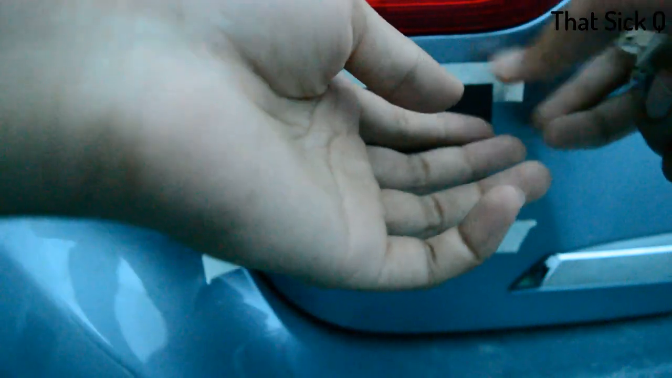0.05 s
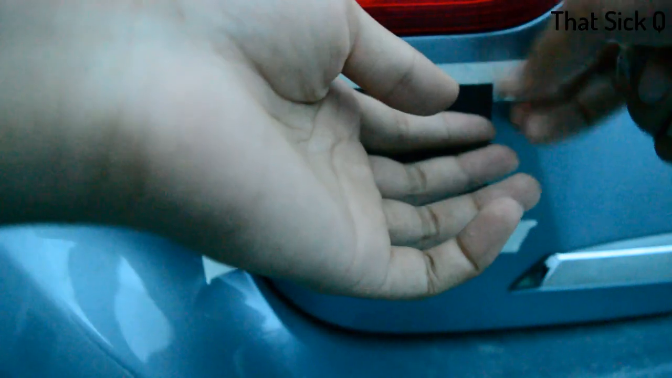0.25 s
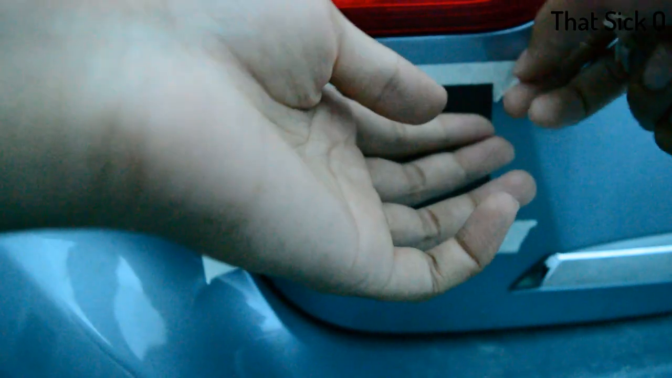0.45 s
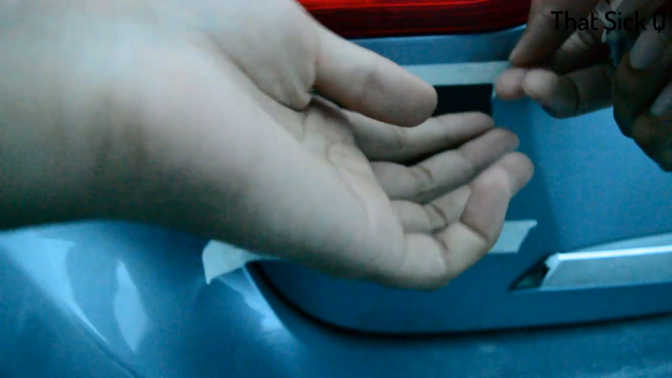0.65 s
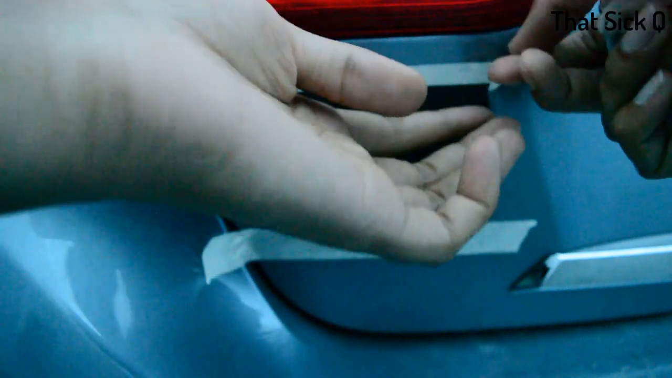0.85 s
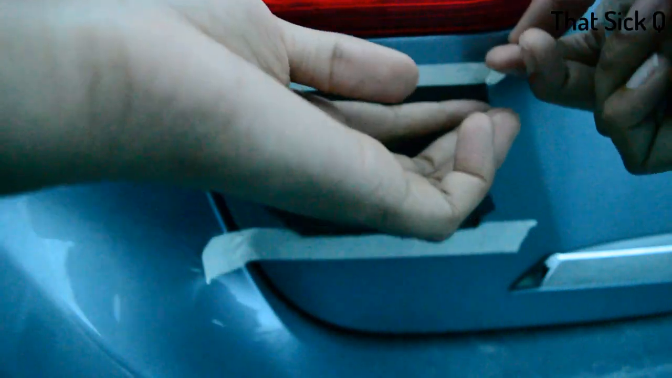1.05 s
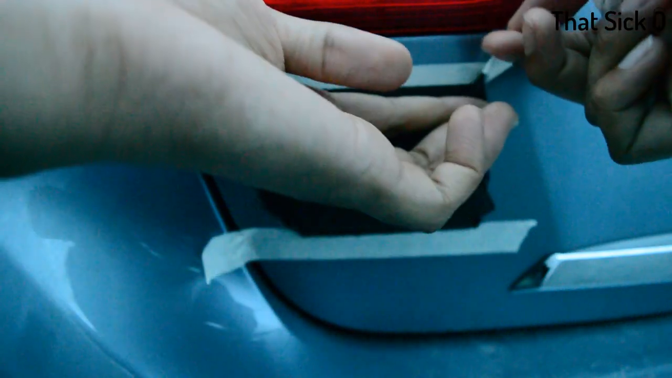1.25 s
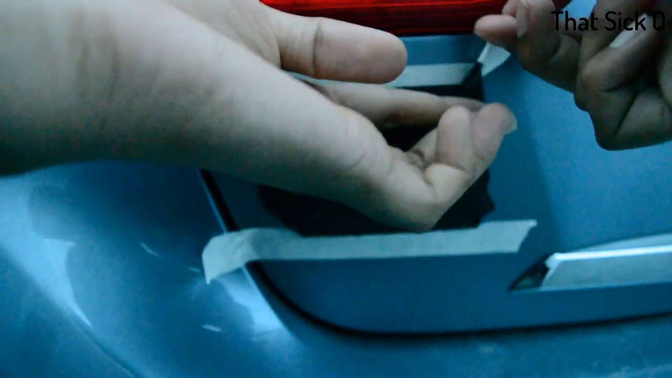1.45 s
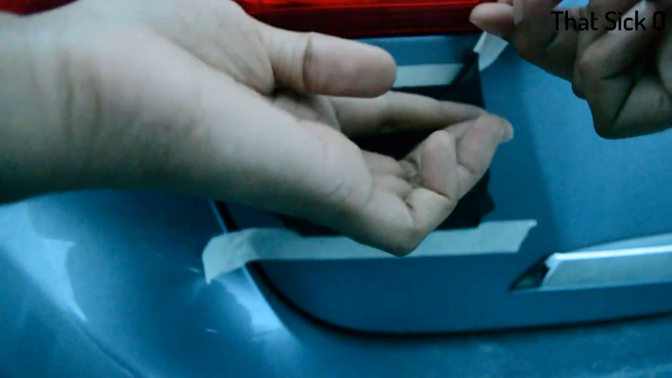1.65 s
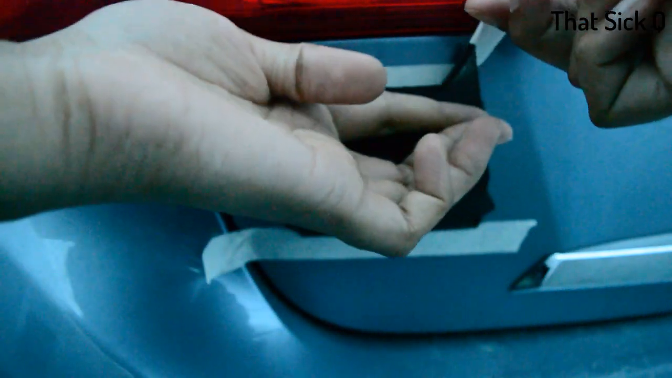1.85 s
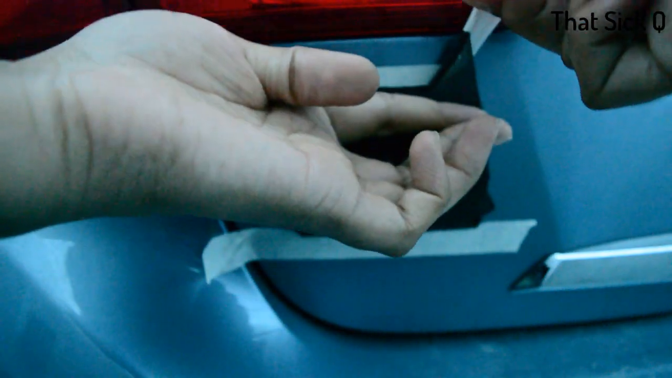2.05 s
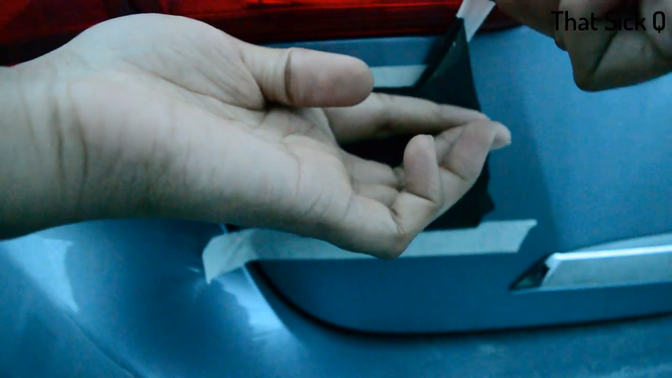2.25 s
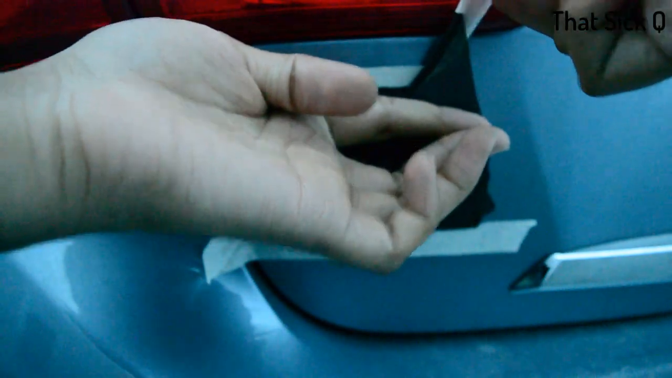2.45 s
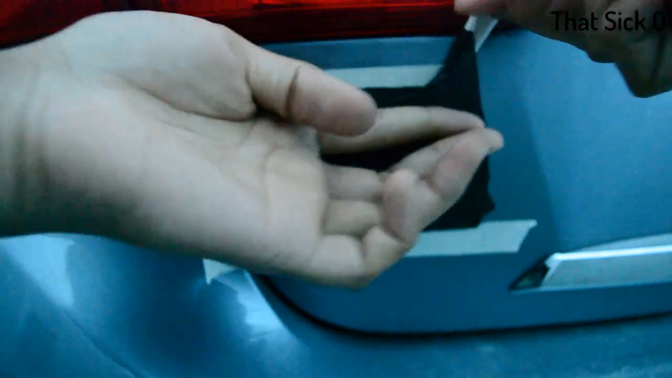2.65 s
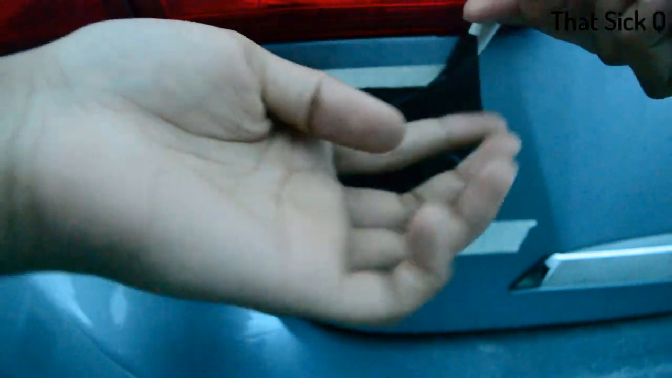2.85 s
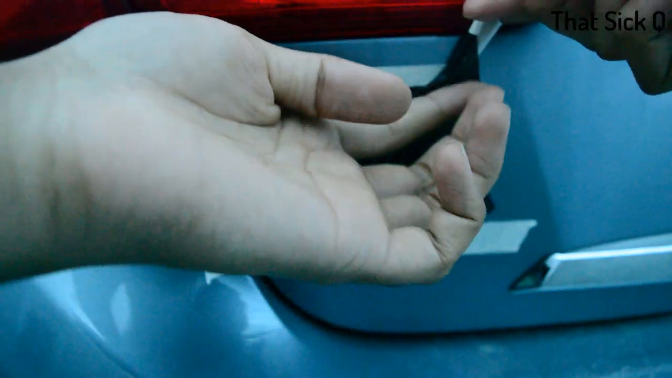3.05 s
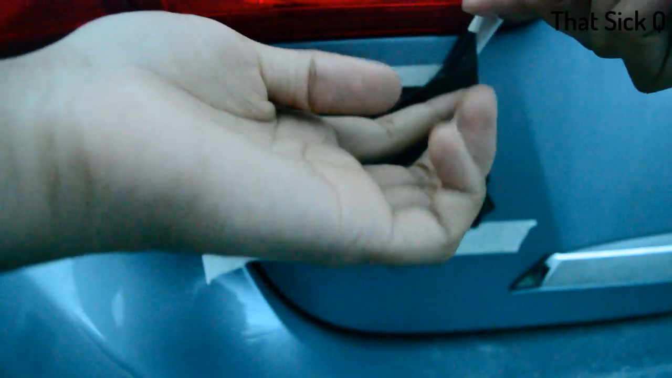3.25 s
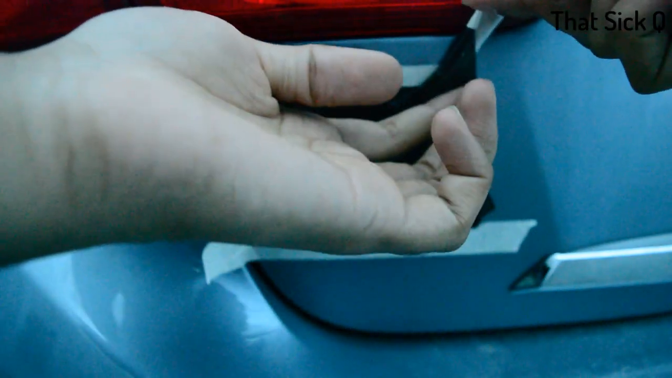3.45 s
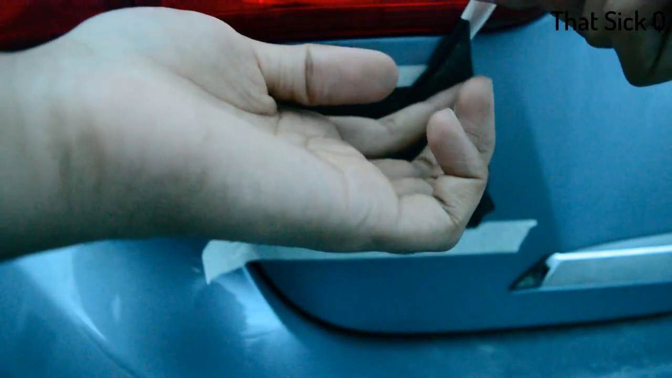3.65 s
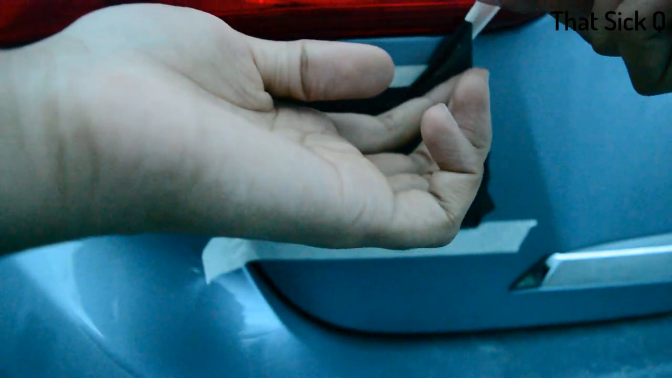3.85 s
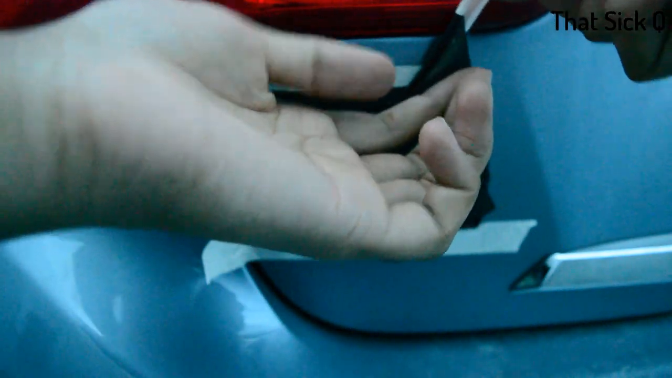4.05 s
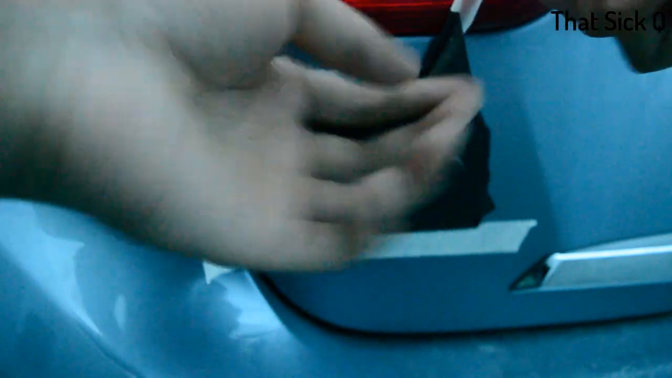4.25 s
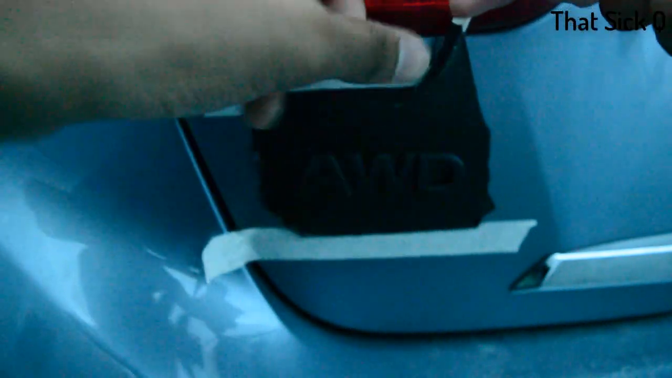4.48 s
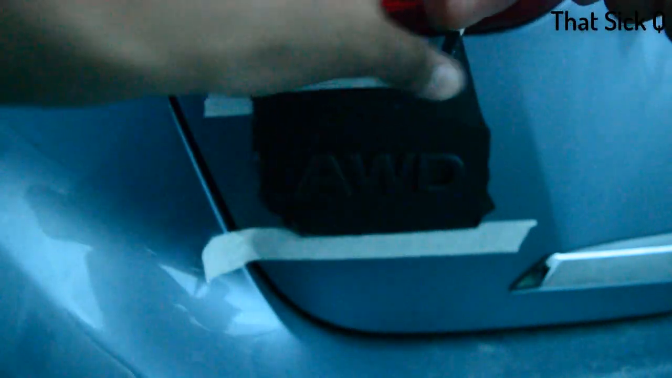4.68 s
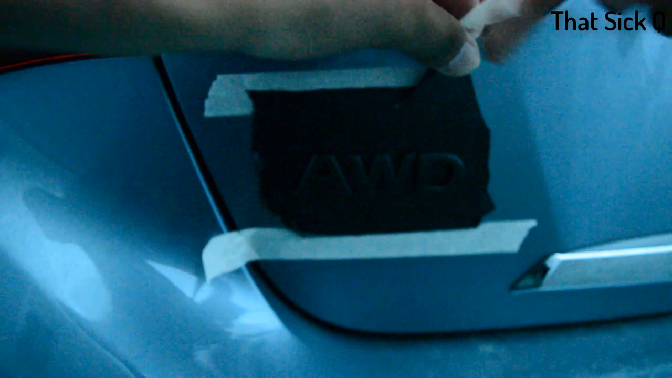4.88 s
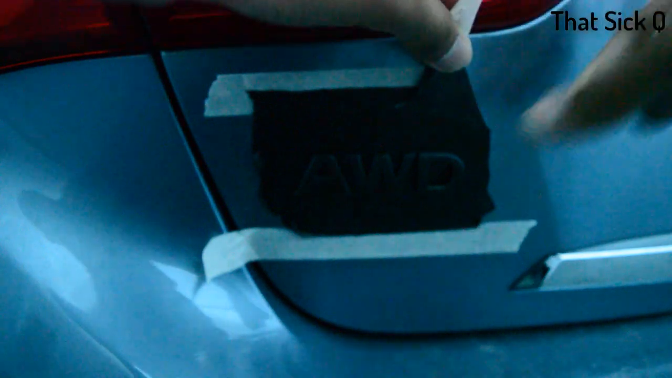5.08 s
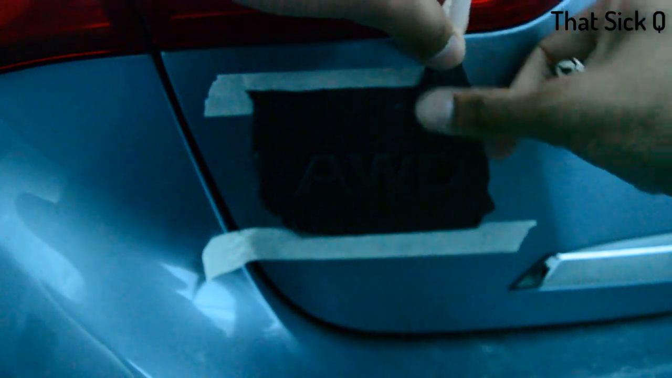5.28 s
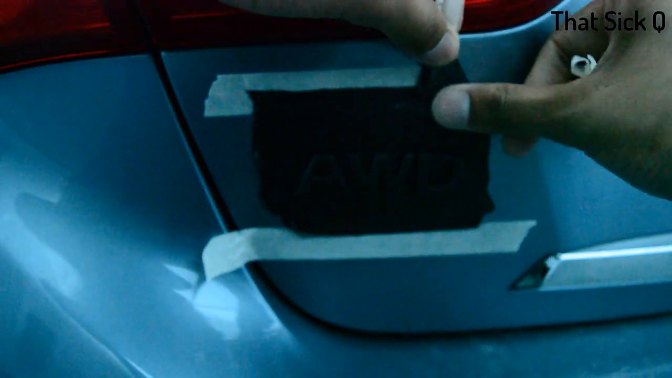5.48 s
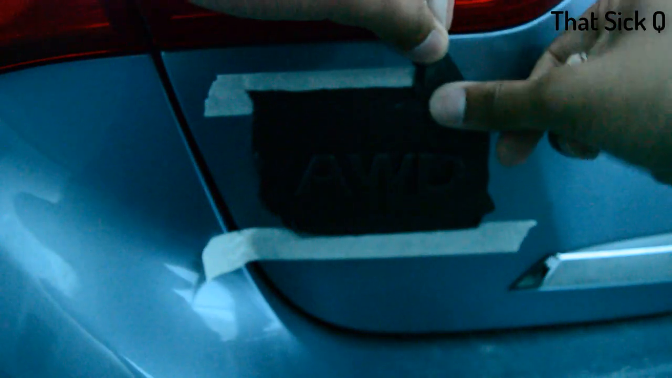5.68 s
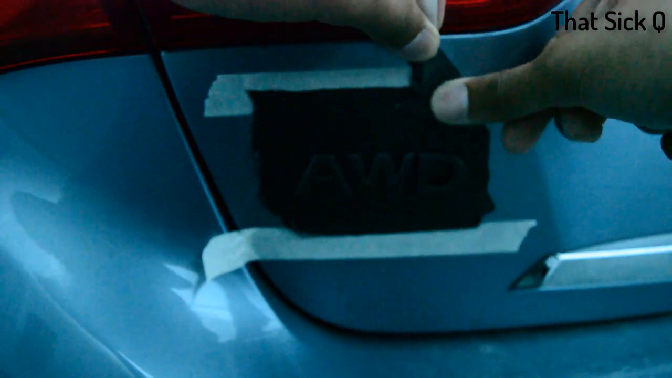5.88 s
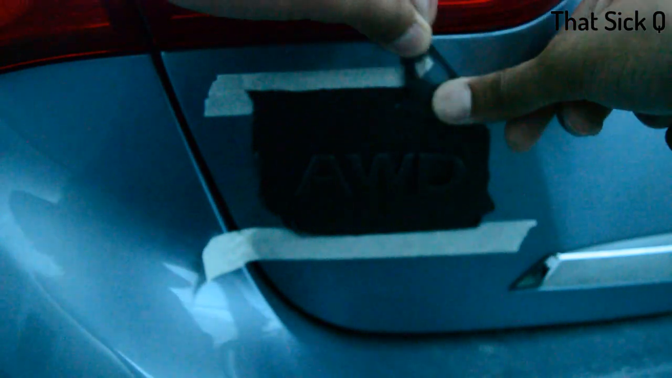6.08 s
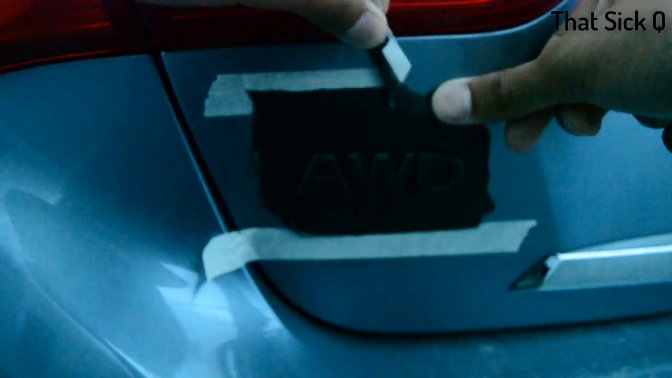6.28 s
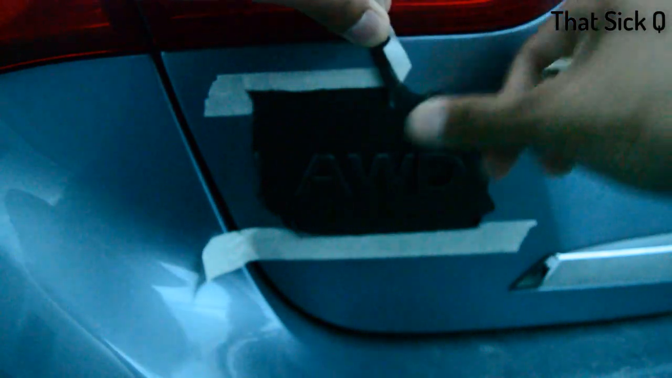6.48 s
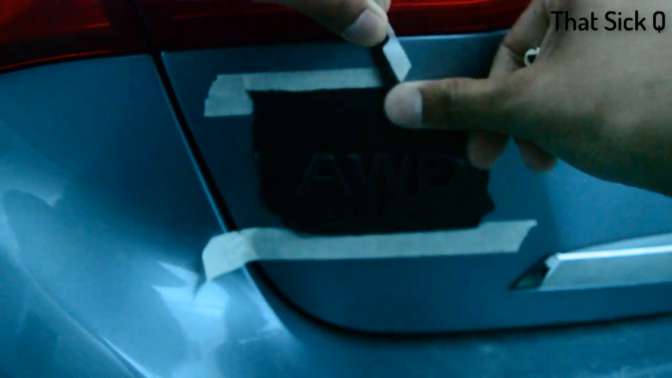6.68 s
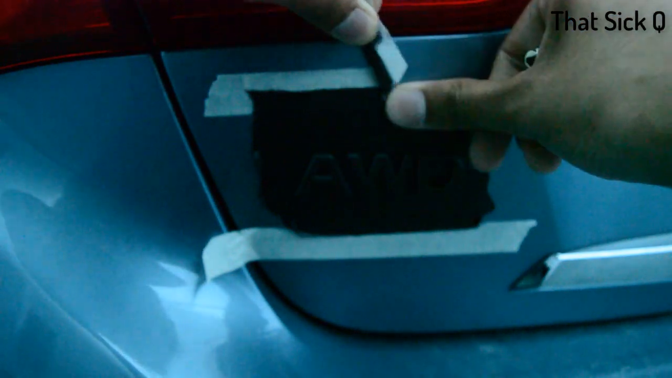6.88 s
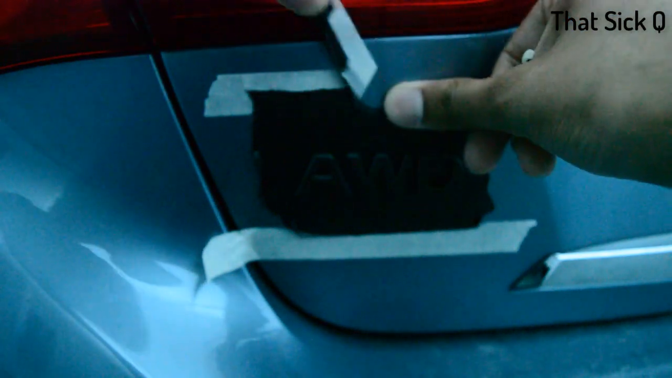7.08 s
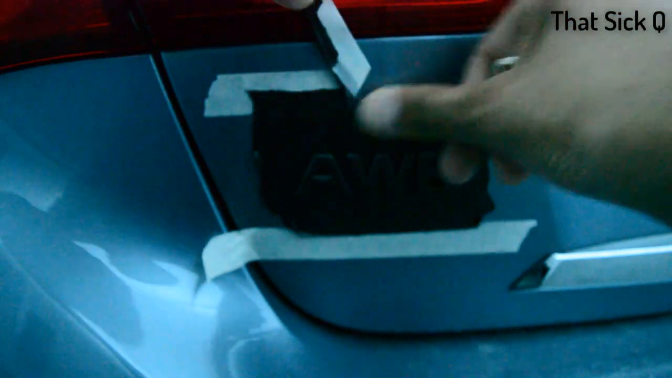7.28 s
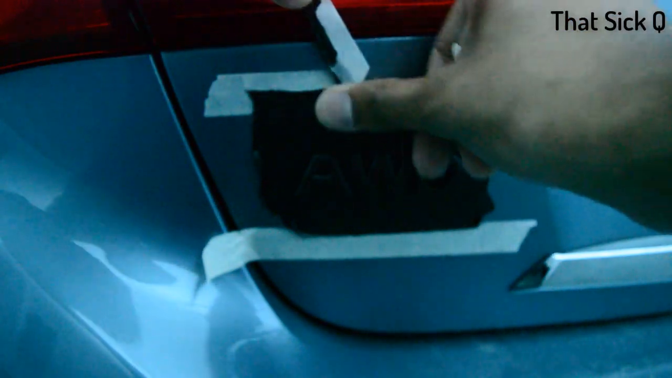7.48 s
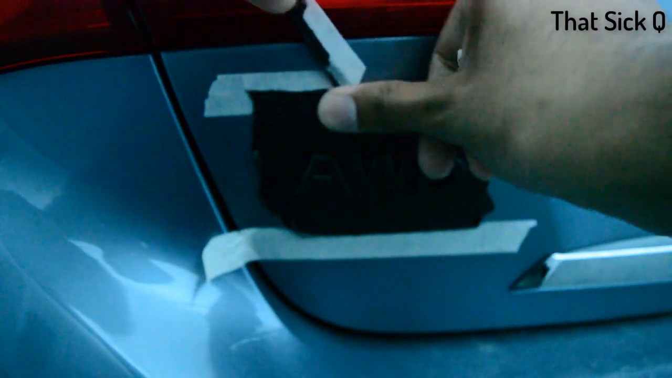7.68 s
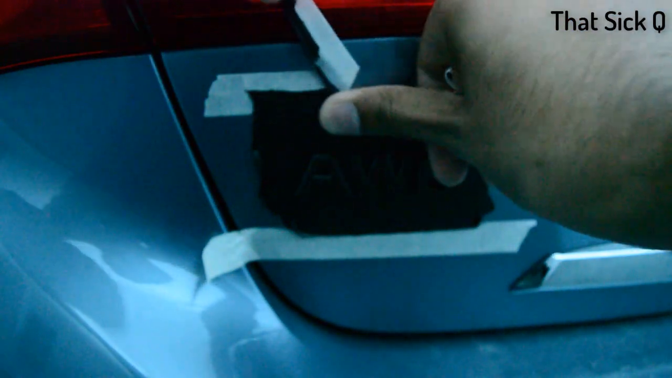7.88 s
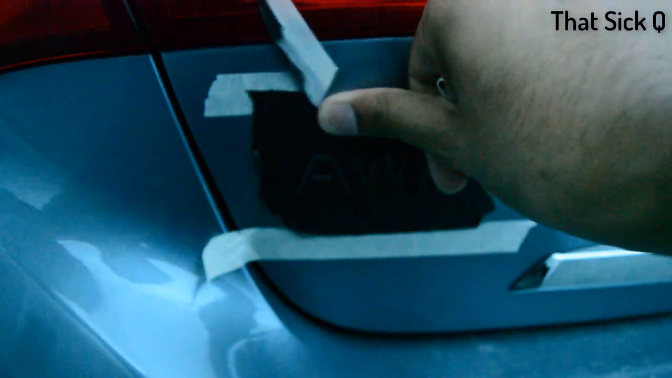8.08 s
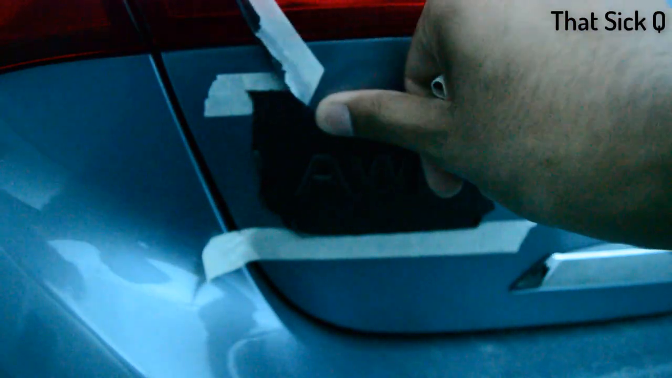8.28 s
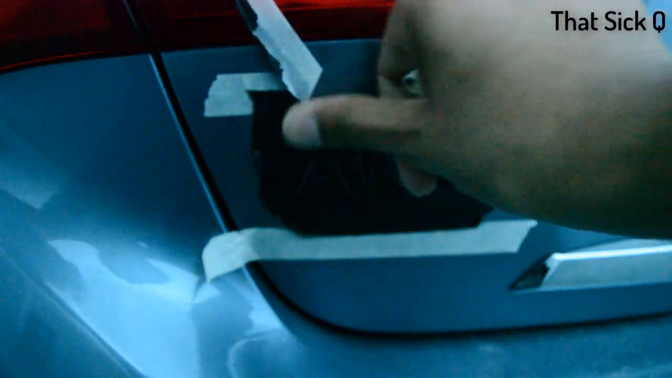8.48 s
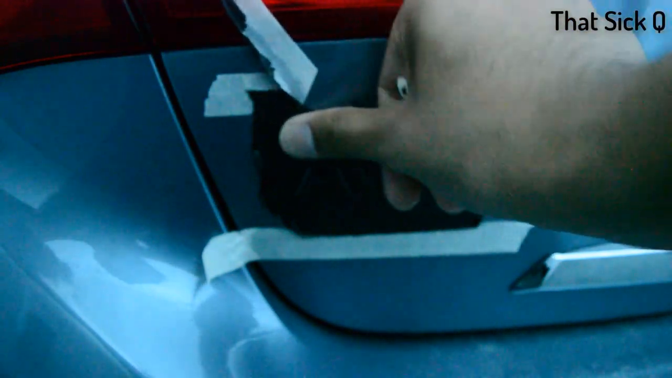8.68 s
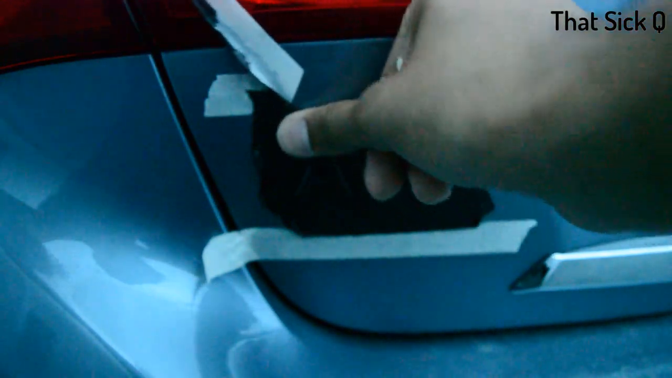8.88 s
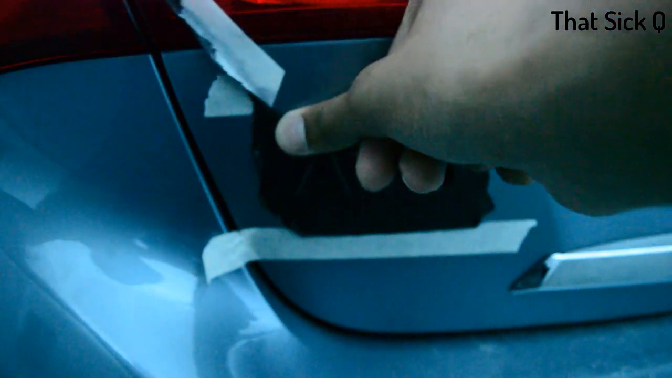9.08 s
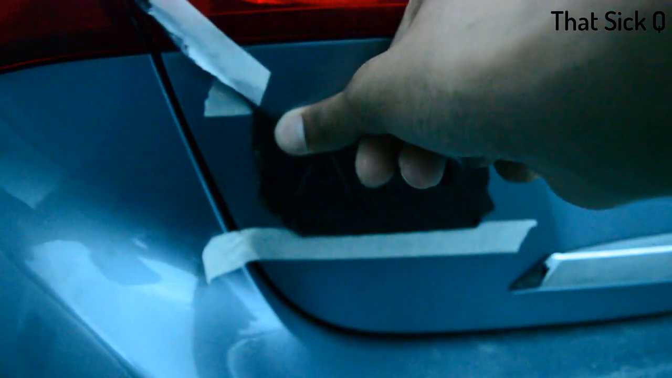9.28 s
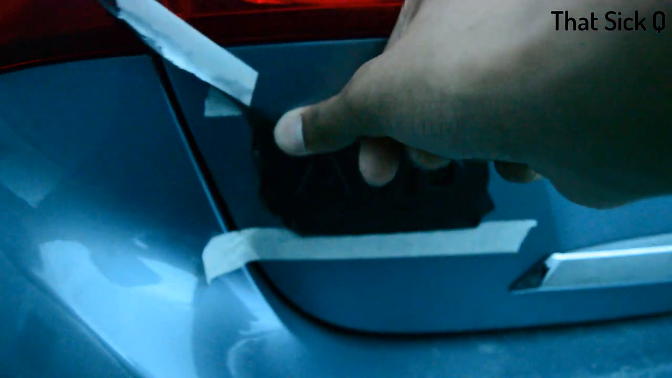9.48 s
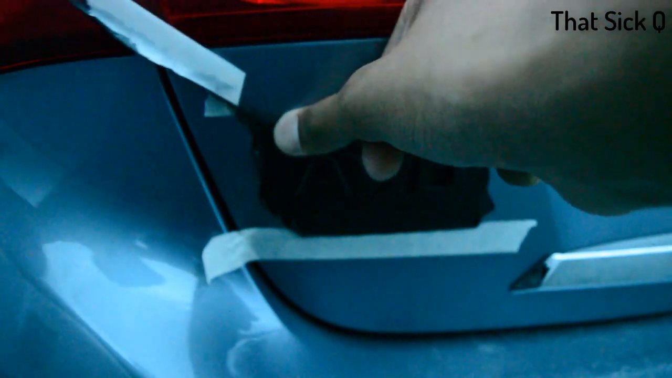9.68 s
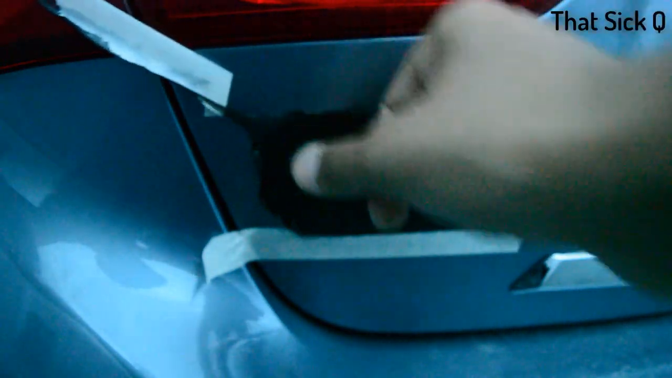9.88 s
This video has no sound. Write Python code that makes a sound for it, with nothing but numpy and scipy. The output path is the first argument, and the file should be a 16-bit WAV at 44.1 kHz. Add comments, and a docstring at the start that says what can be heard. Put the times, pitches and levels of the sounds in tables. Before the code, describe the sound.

Masking tape is peeled off a car's boot lid, close to the microphone, in a slightly reverberant garage. A faint mains hum, a thin whirr and a soft hiss run throughout. From about 0.4 to 2.5 seconds a gentle peel makes a fine, high crackle with single small snaps and a papery rustle. From 2 seconds on, fingers and tugs now and then knock lightly on the sheet metal. Short, irregular tugs follow between 2.7 and 5.7 seconds, with brief rasps near 3.1, 4.1 and 5.5 seconds and a sharper snap at 5. Four stronger peels then come at roughly 5.8 to 6.6, 6.9 to 7.4, 7.5 to 8.5 and 8.6 to 10 seconds. They crackle densely, with some soft rubbing of hands, and the loudest snaps fall near 6.1, 7, 8.2 and 9.9 seconds.

```python
"""Masking tape is peeled off a car's boot lid in a garage, close to a small microphone.
Mains hum, a whirr near 950 Hz and a soft hiss sound from the start. In a first, gentle peel the glue
lets go in a fine crackle and single snaps, which drive the resonances of the taut strip. From 2 s
fingers and tugs jolt the sheet metal into its modes; short tugs follow, three of them rasping.
From 5.8 s to the end come four stronger peels with the loudest snaps."""
import sys
import numpy as np
from scipy import signal
from scipy.fft import rfft, irfft
from scipy.io import wavfile
from scipy.ndimage import uniform_filter1d

SR = 44100
rng = np.random.default_rng(int(sys.argv[2]) if len(sys.argv) > 2 else 0)


def wrap_up_sound(samples):
    """Save the sound to the file named by the first command line argument, as 16-bit audio."""
    columns = np.atleast_2d(samples).T
    # keep every value between -1 and 1, then stretch to whole-number steps
    tamed = np.clip(columns, -1, 1)
    steps = np.round(tamed * 32767).astype(np.int16)
    wavfile.write(sys.argv[1], SR, steps)


N = 437913

# Spectral densities of hiss, glue crackle, paper strip and rubbing hands: f/Hz, level/dB
HISS_SPECTRUM = [(12, -31), (20, -3), (65, 8.5), (124, -9), (169, -2), (794, -7), (939, -11.5), (1080, -6),
                 (1950, -7), (2240, -8.5), (4530, -18), (7100, -17.5), (9670, -33), (15200, -17),
                 (16500, -36.5)]
CRACKLE_SPECTRUM = [(1760, -29), (3000, -21), (3480, -19.5), (4640, -10), (6620, -6), (8500, -3),
                    (9600, 0.5), (11600, -6), (15100, -17.5), (16000, -12.5), (16500, -50.5)]
STRIP_SPECTRUM = [(200, -31), (600, -11.5), (1200, 0), (3000, -1), (6000, -2), (9000, -22.5)]
RUB_SPECTRUM = [(20, 6), (50, 3), (120, -5), (300, -3), (640, 0), (900, 3), (1500, -23)]
# Bands of the mains hum and the whirr: f/Hz, width/Hz, level/dB
HUM_BANDS = [(62.6, 31, -81), (115.3, 7.5, -82.5), (237.6, 7.4, -91.5), (958.5, 55, -80), (1955, 70, -89.5)]
# Tape held still: crackle/dB, strip/dB, fizz (top treble) re crackle/dB, rubbing/dB
REST_LEVELS = (-79, -77.5, -16, -79.5)
# Long peels, one curve each: t/s, crackle/dB, strip/dB, fizz re crackle/dB, rubbing/dB
PEEL_CURVES = [
    [(.42, -72, -94, -11, -80), (.5, -66, -66, -10, -72.5), (.7, -69, -73.5, -21, -79.5),
     (.79, -68.5, -70, -12, -82), (.83, -68, -65, -7, -77), (1.005, -73, -74, -5, -93),
     (1.12, -66.5, -66.5, -6, -85), (1.43, -62.5, -65, -2, -91), (1.73, -61, -67.5, -7, -87),
     (1.8, -64, -67, -8, -90), (2.11, -57.5, -58.5, -7, -67), (2.35, -55.5, -61, -9, -70),
     (2.53, -80, -73, -10.5, -77)],
    [(5.78, -66, -78, -12, -77.5), (5.95, -64.5, -60.5, -14, -66.5), (6.09, -72, -68.5, 1, -72),
     (6.133, -64, -58, -16, -49.5), (6.178, -46, -54, -13.5, -53.5), (6.47, -71.5, -70, -18, -82),
     (6.55, -70.5, -73, -12, -67), (6.68, -77, -79, -10.5, -81)],
    [(6.93, -67, -89.5, -9, -78.5), (6.963, -63.5, -57.5, -8, -59.5), (6.986, -43.5, -48, -11, -53),
     (7.056, -49.5, -60.5, -17, -61.5), (7.163, -47.5, -62.5, -2, -66), (7.306, -68.5, -72, -15, -76),
     (7.45, -83.5, -79, -20, -80)],
    [(7.48, -74.5, -73.5, -9, -74), (7.52, -73, -70.5, -14, -78), (7.62, -70.5, -79, -10.5, -72.5),
     (7.775, -58, -73.5, -14, -76), (7.81, -53, -66, -10, -82), (7.93, -53, -67.5, -11, -67),
     (8.005, -48.5, -64.5, -5, -68.5), (8.178, -46, -62, -12, -64), (8.42, -69.5, -77, -19, -79),
     (8.55, -81, -78, 0.5, -81)],
    [(8.6, -74.5, -77.5, -2, -87), (8.68, -66.5, -74.5, -3, -74), (8.855, -54.5, -66, -6, -81),
     (8.99, -52.5, -72, -14, -71), (9.07, -49, -63, -19, -70), (9.22, -56.5, -70.5, -16, -78.5),
     (9.44, -52.5, -74, -13, -76.5), (9.58, -53.5, -73, -18, -80), (9.93, -46, -65, -17, -66.5)],
]
# Short tugs and fingerings: t at full strength/s, hold/s, crackle/dB, strip/dB, rubbing/dB
SHORT_TUGS = [(0.001, .11, -67, -68.5, -73), (0.328, .005, -68, -74, -69), (.388, .005, -67.5, -85, -90),
              (2.685, 0.12, -71, -72, -73.5), (3.166, .005, -57.5, -59, -85),
              (3.583, 0.17, -62, -69.5, -76.5), (3.79, 0.074, -72, -75, -72), (3.92, 0.11, -69, -70, -71),
              (4.067, 0.043, -57, -60, -71), (4.146, 0.0042, -45.5, -47.5, -78), (4.22, .05, -72, -80, -86),
              (4.34, 0.013, -68.5, -71, -82), (4.571, 0.083, -65, -63, -62), (4.727, .005, -55, -57, -64),
              (4.79, 0.072, -60, -63.5, -72), (4.888, 0.051, -65, -66, -61), (4.964, 0.041, -49, -56, -66),
              (5.051, 0.088, -66, -67, -67), (5.177, 0.088, -73, -72, -86), (5.48, 0.06, -53.5, -51, -86),
              (5.593, 0.1, -69, -67.5, -76), (5.693, 0.018, -54.5, -54.5, -61.5),
              (6.9, 0.0065, -61.5, -76, -80)]
# Resonances of the free strip: t/s, low f/Hz, its share/dB, upper f/Hz, its share/dB,
# lift of the crackle under 7.6 kHz/dB
FREE_STRIP = [(0, 2310, -8, 4310, -11.5, 3.5), (.5, 3540, -1.5, 4634, 7.5, 5.5),
              (.85, 2634, 7, 4236, -4.5, 5), (1.1, 2420, 1, 4620, 9.5, 9), (1.22, 2165, 0, 4520, -4, 1),
              (1.27, 2160, -0.5, 3200, 0, 7), (1.48, 1900, 8, 3240, 11.5, 6),
              (1.72, 1500, 13.5, 3060, -1, 0), (2.05, 1300, -6.5, 3240, -17, 2.5),
              (3.5, 1623, -11.5, 3016, -11.5, 3), (4.5, 1610, 0.5, 3420, -15.5, -8),
              (5.5, 1567, -3, 3920, -5.5, 6.5), (5.7, 1646, 3, 2960, -9, 1),
              (6.13, 1625, -7, 2810, 3, -1.5), (7.8, 1600, 1.5, 2750, -10, -7.5),
              (8.15, 1687, -13, 2880, 10, -12), (8.65, 1510, 7, 2820, 0.5, 0.5),
              (9.1, 1665, -14, 2850, 8, -6.5), (9.4, 1604, -9.5, 3760, -3.5, -4.5),
              (9.93, 1678, 6, 3800, -18, -5)]
# Reverberation time of the garage: f/Hz, t60/s
GARAGE_DECAY = [(200, 0.7), (1000, .6), (4000, 0.57), (10000, 0.26), (16000, 0.66)]
# Snaps of glue and creasing paper: t/s, level/dB, centre f/Hz, strip share/dB, strip f/Hz, t60/s
GLUE_SNAPS = [(.3325,-45.5,9400,-14,3860,0.018),(.3409,-47,9700,-14,4300,0.0087),(.374,-48,10600,-26,2540,0.012),(.447,-41,10200,-16,4210,0.0039),(.4708,-47,7750,-16,4560,.0039),(.6108,-53,8700,0,4390,.0073),(.6673,-55,9300,0,4020,.0102),(.8114,-27.5,8000,-7,3000,0.0067),(.8846,-39,8250,-11,2920,.0051),(.9212,-40,7100,-24,3100,0.003),(.9457,-41.5,8750,-11,2760,.0058),(1.1918,-47,12300,-4,2390,0.0059),(1.2718,-41,10500,-16,4150,0.0037),(1.3683,-43,9600,-6,3650,0.0086),
              (2.709,-41,9900,-28,3410,.0055),(2.73,-38.5,9450,-29,3970,0.014),(2.7692,-36.5,8700,-20,3340,0.0027),(2.7833,-46,9100,-29,4050,0.0052),(3.1295,-39.5,9700,-16,3650,0.0062),(3.1892,-44.5,9800,-4.5,4620,0.015),(3.5886,-39.5,10000,-11,3230,0.0076),(3.6057,-32.5,10100,-12,4150,0.0064),(3.6903,-37.5,10400,-11,3930,.0064),(3.725,-47,8800,-23,3980,.0022),(3.8036,-31,10300,-11.5,3770,0.0061),(3.8474,-44,8800,-10,4780,0.012),(3.875,-41,9300,-12,2230,0.011),(3.8949,-33,8500,-23,3310,0.01),(3.8973,-42,9300,-6,3800,0.021),(3.9297,-34,9500,-12,4800,.025),(3.9356,-38,9000,-6.5,3200,0.0092),(4.0518,-43,9500,-5,5150,.006),(4.064,-34,9100,-10,4940,.0092),(4.0816,-40,9500,-10,3140,.0033),
              (4.554,-31,8250,1,3380,0.01),(4.5932,-35,9700,-26,3980,.0052),(4.6327,-45,9300,-24,3830,0.0098),(4.6383,-30,9100,-26,4360,0.0046),(4.6555,-30.5,8700,-16.5,4030,0.0088),(4.705,-34,8800,-10,3900,.011),(4.7165,-34,9050,-20,3730,.01),(4.7273,-30.5,9200,-6,3770,0.012),(4.8991,-50.5,6540,10.5,1970,0.0077),(4.9532,-38,10100,-15,3760,.0025),(4.992,-26,9800,-19,4810,0.025),(4.997,-19.5,10100,-15.5,4170,.015),(5.0387,-36,9200,-12,4500,0.0071),(5.196,-51,9100,-26,3470,.012),(5.224,-40,8600,-15,5100,0.011),(5.342,-49.5,9150,-18,2460,0.0075),(5.4642,-37.5,9250,-6,2450,0.02),(5.5188,-33.5,9050,-13.5,3700,.011),(5.5448,-32,9200,-18,2540,.0061),(5.642,-48,9000,-22,2150,.0043),(5.6733,-37,10900,-8.5,4010,0.005),(5.6814,-35,10500,-9.5,3650,0.0067),(5.702,-34.5,10200,-8,4350,0.0064),(5.718,-34.5,10400,-14,3630,.008),(5.7888,-32,8400,-24,3870,0.012),(5.7928,-32,8650,-24,3530,0.0057),(5.8442,-37,8300,-11.5,3700,0.011),
              (5.8901,-30.5,8400,-13,3340,0.013),(5.9143,-26.5,8300,-15.5,3590,0.01),(5.9356,-30.5,8400,-14,3670,0.012),(5.9545,-32,8900,-12.5,3830,.0051),(5.9762,-32.5,8500,-17.5,3760,0.0041),(5.9943,-37,8550,-20.5,3230,0.0062),(6.0087,-36,8550,-13.5,3250,0.0047),(6.024,-41,8200,-19,3400,.0062),(6.0447,-41,8000,-13,3600,.0063),(6.0685,-40,8200,-18.5,3300,.0061),(6.0892,-36,8300,-16,3450,0.0092),(6.1065,-32,8400,-26,3630,.0049),(6.1189,-35,8200,-19,3640,.0048),(6.1259,-9,9600,-13.5,2900,0.013),(6.1274,-35.5,9000,3.5,2720,0.016),(6.164,-7,10500,-28.5,3000,.0035),(6.173,-28,9700,-19,2910,.0038),(6.1822,-17.5,9800,-15,4100,0.0056),(6.2211,-29,11200,-16,4450,0.0055),(6.2538,-28.5,9600,-32,3540,.0073),(6.316,-32.5,9600,-21,3170,0.0052),(6.687,-49,10600,-11,3450,0.0033),(6.7653,-52.5,9500,-7,2060,0.0031),
              (6.8958,-43,10800,-16,2970,.0065),(6.9357,-40,10300,-28,3470,.0072),(6.9522,-26,10100,-24,3050,0.0049),(6.9626,-28,9700,-27.5,3000,.0041),(6.9688,-18,9600,-20,3480,.0028),(6.9732,-13.5,9700,-21,3030,0.014),(6.993,-17.5,10600,-42.5,4100,0.0092),(7.01,-19,9000,-16,4970,0.0027),(7.015,-17,10300,-29,3850,0.0019),(7.0342,-20,10800,-35,3440,.0031),(7.0578,-14,11400,-27,2590,0.0049),(7.0875,-29,9800,-14,4680,.0034),(7.141,-33,11800,-23,3830,0.0027),(7.2254,-34,10500,-29,4070,.0071),(7.4534,-56,11300,-20.5,2790,.0042),(7.545,-48.5,8200,-8,3900,.0061),(7.612,-46,9300,-30,2770,.0055),(7.6373,-44,9500,-25,3070,0.0043),(7.6722,-41.5,9700,-21,2720,0.0065),(7.7523,-36,10100,-21.5,2970,0.0025),(7.8524,-36,10800,-17.5,2530,.0055),(7.8763,-29.5,10800,-9.5,2830,0.0036),(7.9874,-37,9800,-15.5,3080,.0076),(7.9976,-17,10200,-21,3960,0.0019),(8.033,-26,10800,-32,2900,0.0077),(8.0768,-35,10800,-29,3710,0.0059),(8.103,-44,9800,-18.5,2870,.0071),(8.1145,-31.5,11600,-12,3100,0.0066),(8.1189,-23,11500,-11,2850,.0049),(8.1415,-25,9500,-16.5,3390,.0037),(8.1673,-10.5,11000,-18.5,2920,0.0046),(8.1867,-38,10400,-2,3170,0.0064),(8.2036,-32,10600,-16,2910,.0044),(8.4405,-48.5,9500,-3,2920,0.0026),
              (8.7234,-39.5,9900,-20,3220,0.0028),(8.7413,-38,9400,-21,3050,.0046),(8.7562,-35.5,10700,-10,2980,0.0088),(8.8119,-35,10600,-14.5,3160,.0048),(8.849,-31,10000,-20,3210,0.0034),(8.913,-36,9800,-13.5,3120,.0036),(8.9315,-29.5,10500,-27,3810,.0038),(9.0145,-23.5,9800,-19,4400,0.0055),(9.0189,-26,8900,-34,4690,0.0073),(9.0248,-24,9350,-15,3230,.0042),(9.0497,-21.5,10300,-21,2940,0.0053),(9.1265,-32.5,9900,-12,2930,0.0073),(9.3041,-26.5,9100,-13,5300,.0057),(9.4704,-36.5,9800,-21,4930,.012),(9.5332,-20,8500,-15,4800,0.0019),(9.6628,-34,8700,-15,4600,.0051),(9.84,-39,9600,-3,4790,.0029),(9.8685,-15,9550,-26.5,4970,.0029)]
# Modes of the sheet metal: f/Hz, level/dB, t60/s
PANEL_MODES = [(85, -14, 0.14), (228, 2.5, 0.074), (257, -8.5, 0.076), (324, -7, 0.11), (454, -2, 0.16),
               (638, 4.5, 0.092), (775, 1, 0.069), (974, 7, 0.074), (1202, 15.5, 0.02), (1504, 13.5, 0.056)]
# Jolts from fingers and tugs: t/s, level/dB, best excited f/Hz, bass share/dB
PANEL_JOLTS = [(2.035, -55, 1270, -15), (2.096, -60, 1210, -16), (2.308, -51.5, 452, -24),
               (2.657, -53.5, 447, -25), (2.882, -57, 633, -16), (3.891, -54.5, 431, -27),
               (3.924, -52.5, 433, -15), (4.551, -35, 686, -34), (4.724, -58, 581, -21),
               (4.896, -40.5, 940, 3), (4.919, -46.5, 231, 13), (5.002, -37, 950, -31),
               (5.338, -54, 439, -24), (5.89, -56, 432, -16), (6.122, -35.5, 624, -30),
               (6.164, -37.5, 600, -9), (6.182, -39, 705, -19), (6.522, -52, 592, -24.5),
               (6.809, -53.5, 646, -22), (6.829, -55, 635, -10), (6.971, -32.5, 622, -24),
               (6.992, -36.5, 636, -13), (7.055, -44, 645, -19), (7.328, -52, 1106, -21),
               (7.864, -47, 1200, -13), (7.994, -51, 606, -16.5), (8.059, -51, 624, -20),
               (8.116, -45, 630, -7), (8.166, -43.5, 625, 2), (8.209, -48, 633, -15),
               (8.543, -58, 535, -4.5), (9.027, -50, 1090, -22), (9.529, -62, 910, -17)]
# Rasping tugs: t/s, rise/s, hold/s, fall/s, level/dB, low f/Hz, middle f/Hz, middle share/dB,
# top share/dB
RASPING_TUGS = [(3.128, 0.01, 0.01, 0.038, -62.5, 1590, 4770, -3, -4),
                (4.123, 0.028, 0.0043, 0.023, -57, 1700, 5070, 5.5, 0.5),
                (5.455, 0.011, 0.075, .04, -51, 1415, 5700, -3, -8.5)]

HISS_DB, BAND_LIMIT_HZ = -74.5, 15750
TUG_RISE_DB_PER_S, TUG_FALL_DB_PER_S = 640, 450
LID_HZ, LID_WIDTH_HZ, LID_DB = 636.3, 30, -10.5  # the panel mode that sings in the rubbing
TICK_OVER_CRACKLE_DB, TICK_SPREAD_DB, TICK_STRIP_DB, TICK_T60_S = 11.5, 3.5, -15, 0.0028
RASP_EDGE_DB, RASP_GLIDE_PER_S, RASP_TOP_HZ = -29, 1.6, 8700


def gain_of(db):
    """Amplitude ratio of a level in decibels."""
    return 10 ** (np.asarray(db) / 20)


def unit_rms(x):
    """Normalisation to unit power."""
    return x / np.sqrt(np.mean(x ** 2) + 1e-20)


def value_at(points, hz):
    """Interpolation on a logarithmic frequency axis."""
    f, value = np.transpose(points)
    return np.interp(np.log(hz + 1), np.log(f + 1), value)


def follow(rows, t=None):
    """Linear interpolation of each column in time."""
    times, *columns = np.transpose(rows)
    return [np.interp(np.arange(N) / SR if t is None else t, times, c) for c in columns]


def coloured(x, spectrum):
    """Minimum-phase filtering: the phase follows from the log gain by the Hilbert transform."""
    hz = abs(np.fft.fftfreq(4096, 1 / SR))
    log_gain = np.log(gain_of(np.maximum(value_at(spectrum, hz), -100)))
    taps = np.fft.ifft(np.exp(np.conj(signal.hilbert(log_gain)))).real[:2048]
    return signal.oaconvolve(x, taps)[:N]


def resonate(x, hz, width_hz):
    """Resonance of unit gain by heterodyning: shift hz down to zero, smooth, shift back."""
    carrier = np.exp(2j * np.pi * np.cumsum(hz * np.ones(len(x))) / SR)
    pole = np.exp(-np.pi * width_hz / SR)
    return 2 * (carrier * signal.lfilter([1 - pole], [1, -pole], x / carrier)).real


def background():
    """Broadband noise is heard as a wavering hiss, narrowband noise as pitched hum and whirr."""
    waver = unit_rms(uniform_filter1d(uniform_filter1d(rng.standard_normal(N), 6000), 6000))
    hiss = gain_of(HISS_DB + 1.7 * waver) * unit_rms(coloured(rng.standard_normal(N), HISS_SPECTRUM))
    drive = rng.standard_normal(N)
    return hiss + sum(gain_of(db) * unit_rms(resonate(resonate(drive, hz, width), hz, width))
                      for hz, width, db in HUM_BANDS)


def pull_levels():
    """Envelopes in dB of crackle, strip, fizz and rubbing; a tug grows and decays exponentially."""
    t = np.arange(N) / SR
    levels = np.repeat(np.array(REST_LEVELS, float)[:, None], N, 1)
    for curve in PEEL_CURVES:
        span = slice(round(curve[0][0] * SR), round(curve[-1][0] * SR))
        levels[:, span] = follow(curve, t[span])
    for start, hold, crackle_db, strip_db, rub_db in SHORT_TUGS:
        span = slice(max(round(start * SR) - SR // 10, 0), round((start + hold) * SR) + SR // 5)
        age = t[span] - start
        drop_db = np.maximum(-TUG_RISE_DB_PER_S * age, TUG_FALL_DB_PER_S * np.maximum(age - hold, 0))
        for row, db in ((0, crackle_db), (1, strip_db), (3, rub_db)):
            levels[row, span] = np.maximum(levels[row, span], db - drop_db)
    return levels


def glue_threads(per_s, spread_db, burst_s):
    """Poisson process: threads break at random, most small, a few large, each a puff of noise."""
    size = gain_of(spread_db * np.minimum(rng.exponential(1, N), 4))
    breaks = size * (rng.random(N) < per_s / SR)
    power = signal.lfilter([1], [1, -np.exp(-1 / (burst_s * SR))], breaks ** 2)
    return unit_rms(np.sqrt(power) * rng.standard_normal(N))


def creased_paper(x, brief_db, lasting_db):
    """Spectral modulation: paper resonances come and go, wide and brief or narrow and lasting."""
    spectra = signal.stft(x, nperseg=256)[2]
    brief, lasting = rng.standard_normal((2, *spectra.shape))
    brief = unit_rms(uniform_filter1d(uniform_filter1d(brief, 8, axis=0), 20, axis=1))
    lasting = unit_rms(uniform_filter1d(uniform_filter1d(lasting, 2, axis=0), 110, axis=1))
    spectra *= gain_of(brief_db * brief + lasting_db * lasting)
    return unit_rms(signal.istft(spectra, nperseg=256)[1][:N])


def peel(crackle_db, strip_db, fizz_db, rub_db):
    """Forced vibration: crackling glue drives the strip's drifting resonances, friction the lid."""
    low_hz, low_db, upper_hz, upper_db, lift_db = follow(FREE_STRIP)
    glue = glue_threads(per_s=5900, spread_db=5.0, burst_s=0.00078)
    crackle = creased_paper(coloured(glue, CRACKLE_SPECTRUM), brief_db=-1.5, lasting_db=-0.5)
    dull = signal.sosfiltfilt(signal.butter(4, 7600, fs=SR, output="sos"), crackle)
    fizz = signal.sosfiltfilt(signal.butter(4, 11800, "high", fs=SR, output="sos"), crackle)
    crackle += (gain_of(fizz_db) / np.std(fizz) - 1) * fizz + (gain_of(lift_db) - 1) * dull

    sparse_glue = glue_threads(per_s=1700, spread_db=2.5, burst_s=0.00078)
    rustle = unit_rms(coloured(0.46 * glue + 1.1 * sparse_glue, STRIP_SPECTRUM))
    low = gain_of(low_db) * resonate(rustle, low_hz, width_hz=260)
    upper = gain_of(upper_db + 1) * resonate(rustle, upper_hz, width_hz=520)
    strip = creased_paper(rustle + low + upper, brief_db=1.0, lasting_db=1.94)

    rub = unit_rms(coloured(rng.standard_normal(N), RUB_SPECTRUM))
    rub += gain_of(LID_DB) * unit_rms(resonate(rub, LID_HZ, LID_WIDTH_HZ))
    return gain_of(crackle_db) * crackle + gain_of(strip_db - 2) * strip + gain_of(rub_db - 4.5) * rub


def garage(x):
    """Reverberation: convolution with reflections of random sign, each band decaying at its own rate."""
    taps = np.zeros(SR)
    starts = np.arange(120, SR - 20, 20)
    taps[starts + rng.integers(0, 20, len(starts))] = rng.choice([-1., 1.], len(starts))
    hz, t, spectra = signal.stft(taps, SR, nperseg=256)
    early = gain_of(20 - 60 * t / 0.016)  # car body and hands reflect first and strongly
    late = gain_of(-60 * t / value_at(GARAGE_DECAY, hz)[:, None])
    response = signal.istft(spectra * (early + late), SR, nperseg=256)[1]
    return signal.fftconvolve(x, response / np.linalg.norm(response))[:N]


def ticks(crackle_db, count=300):
    """Random impulses: rows of small snaps whose levels follow the crackle around them."""
    when, size, centre, pitch = rng.random((count, 4)).T
    times = when * (N - 1) / SR
    excess_db = TICK_OVER_CRACKLE_DB - TICK_SPREAD_DB * np.log(1 - .95 * size)
    levels = crackle_db[(times * SR).astype(int)] + excess_db
    return [(start, db, 8800 + 1900 * c, TICK_STRIP_DB, 2700 + 2100 * p, TICK_T60_S)
            for start, db, c, p in zip(times, levels, centre, pitch)]


def snaps(rows):
    """Sudden release radiates a damped burst of band noise and flicks the strip, which fades slower."""
    t, hz = np.arange(1024) / SR, np.fft.rfftfreq(1024, 1 / SR)
    noises = rfft(rng.standard_normal((len(rows), 2, 1024)))
    out = np.zeros(N + 1024)
    for (start, db, centre_hz, strip_db, strip_hz, t60), noise in zip(rows, noises):
        fade = gain_of(-60 * t / np.clip(t60, .002, .05)) * np.minimum(t / 0.00026, 1)
        band_db = 0.5 * value_at(CRACKLE_SPECTRUM, hz) - 70 * np.log(hz / centre_hz + 0.00078) ** 2
        crack = unit_rms(irfft(noise[0] * gain_of(band_db))) * fade
        crack /= abs(crack).max()
        hump = 1.5 * np.minimum(hz / strip_hz, 1) + 1 / (1 + ((hz - strip_hz) / 450) ** 2)
        flap = unit_rms(irfft(noise[1] * gain_of(value_at(STRIP_SPECTRUM, hz)) * hump)) * fade ** 0.53
        out[round(start * SR):][:1024] += gain_of(db) * (crack + gain_of(strip_db - 3) * flap)
    return out[:N]


def strip_ring(x):
    """Free vibration: each snap leaves the strip's two resonances ringing for a few milliseconds."""
    low_hz, low_db, upper_hz, upper_db, _ = follow(FREE_STRIP)
    low = gain_of(low_db - 0.5) * resonate(x, low_hz, width_hz=260)
    upper = gain_of(upper_db - 2) * resonate(x, upper_hz, width_hz=290)
    return x + low + upper


def panel_knocks():
    """Modal superposition: a short rough push rings the sheet metal, favouring modes near one pitch."""
    t, out = np.arange(SR // 4) / SR, np.zeros(N + SR)
    pushes = rng.standard_normal((len(PANEL_JOLTS), 256)) * np.exp(-np.arange(256) / 72)
    for (start, db, near_hz, bass_db), push in zip(PANEL_JOLTS, pushes):
        ring = np.zeros(len(t))
        for hz, mode_db, t60 in PANEL_MODES:
            coupling_db = bass_db if hz < 300 else -17 * abs(np.log(hz / near_hz))
            ring += gain_of(mode_db + coupling_db - 60 * t / t60) * np.sin(2 * np.pi * hz * t)
        knock = signal.oaconvolve(push, ring)
        out[round(start * SR):][:len(knock)] += gain_of(db - 3.5) * knock / abs(knock).max()
    return out[:N]


def rasps():
    """Dense slips in a fast tug excite three strip resonances; rising tension raises the lowest."""
    slips, out = glue_threads(per_s=1600, spread_db=5.5, burst_s=0.00032), np.zeros(N)
    for start, rise, hold, fall, db, low_hz, mid_hz, mid_db, top_db in RASPING_TUGS:
        t = np.arange(0, rise + hold + fall, 1 / SR)
        span = slice(round(start * SR), round(start * SR) + len(t))
        glide_hz = low_hz * (1 + RASP_GLIDE_PER_S * t)
        ring = unit_rms(resonate(resonate(slips[span], glide_hz, 450), glide_hz, 450))
        ring += gain_of(mid_db) * unit_rms(resonate(slips[span], mid_hz, 760))
        ring += gain_of(top_db) * unit_rms(resonate(slips[span], RASP_TOP_HZ, 1000))
        shape_db = RASP_EDGE_DB * np.maximum(np.maximum(1 - t / rise, (t - rise - hold) / fall), 0)
        out[span] += gain_of(db + shape_db) * ring * signal.windows.tukey(len(ring), .15)
    return out


def scene():
    """Superposition of the direct sound, its reverberation and the background."""
    levels = pull_levels()
    hits = strip_ring(snaps(GLUE_SNAPS + ticks(crackle_db=levels[0]))) + panel_knocks()
    peeling = peel(*levels) + rasps()
    echoes = garage(gain_of(-9) * hits + gain_of(-8.5) * peeling)
    return (hits + peeling + echoes + background())[None]


def record(dry):
    """Band limiting by a linear-phase low-pass filter."""
    lowpass = signal.firwin(255, BAND_LIMIT_HZ, window=("kaiser", 9), fs=SR)
    return signal.oaconvolve(dry, lowpass[None], "same")


dry = scene()
out = record(dry)
wrap_up_sound(out)
```